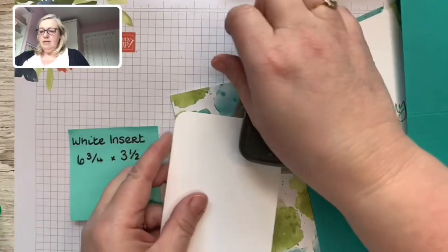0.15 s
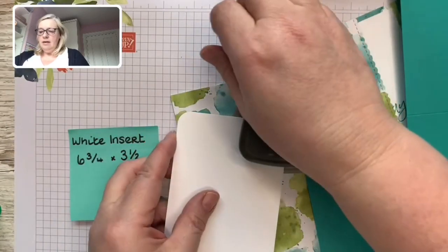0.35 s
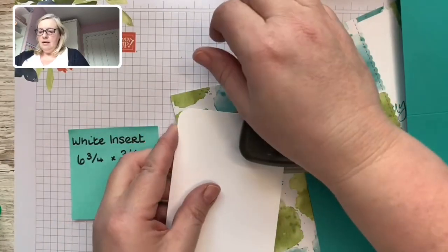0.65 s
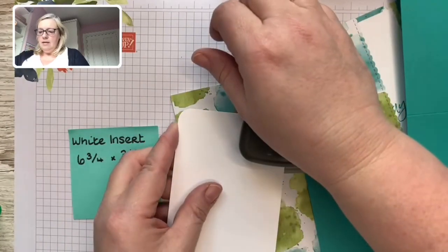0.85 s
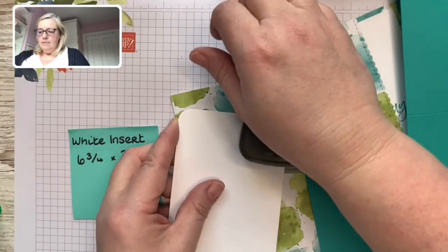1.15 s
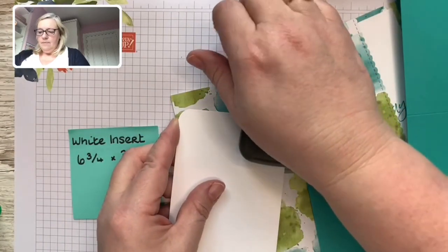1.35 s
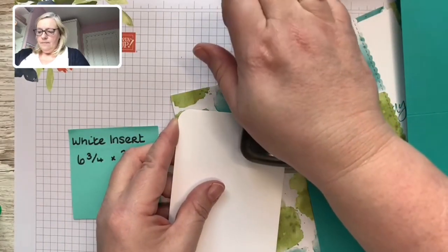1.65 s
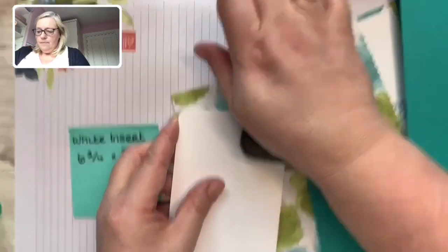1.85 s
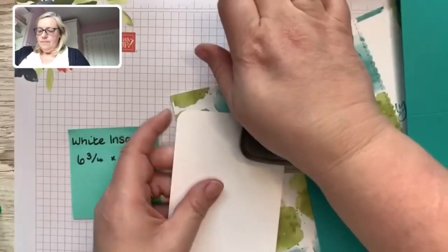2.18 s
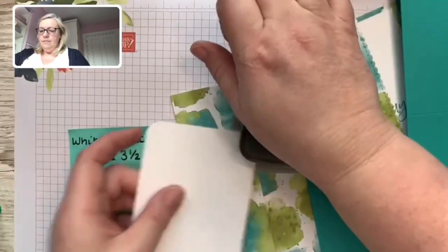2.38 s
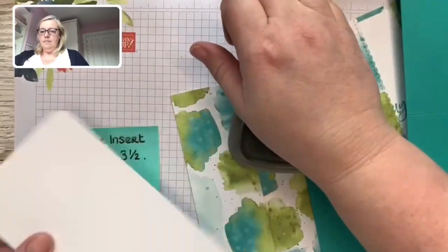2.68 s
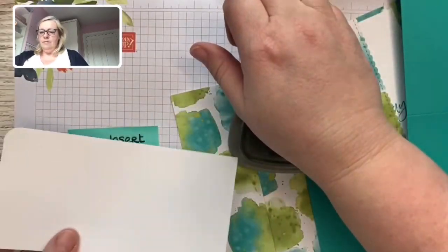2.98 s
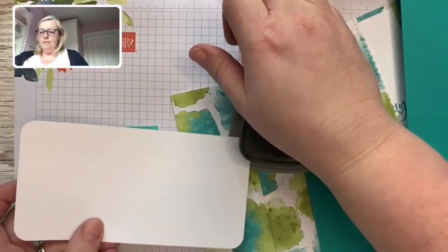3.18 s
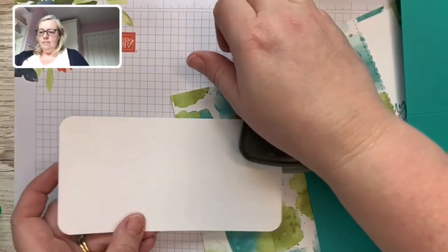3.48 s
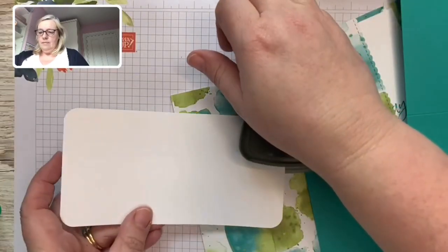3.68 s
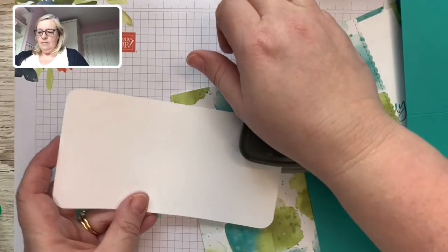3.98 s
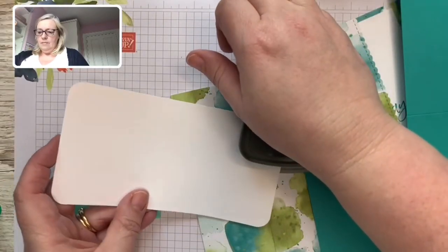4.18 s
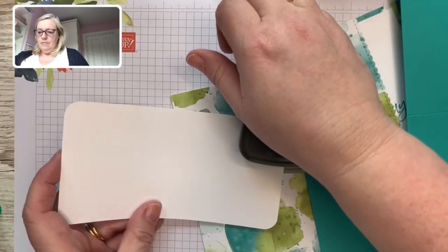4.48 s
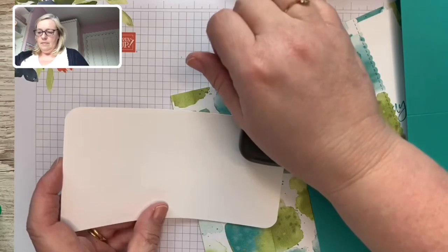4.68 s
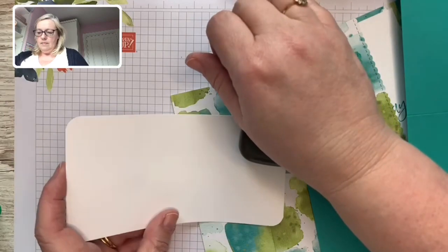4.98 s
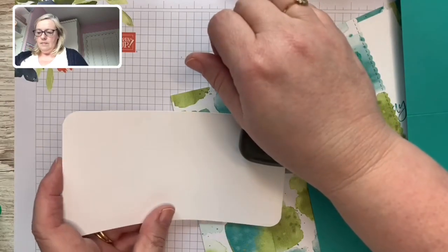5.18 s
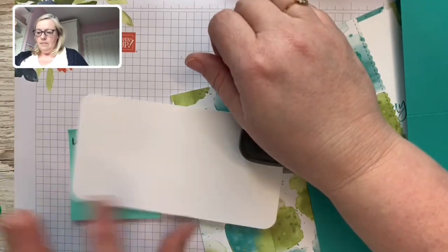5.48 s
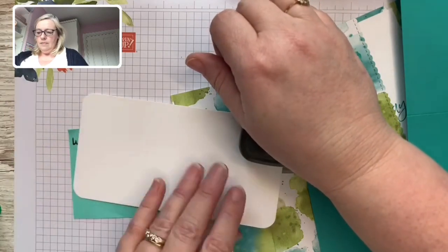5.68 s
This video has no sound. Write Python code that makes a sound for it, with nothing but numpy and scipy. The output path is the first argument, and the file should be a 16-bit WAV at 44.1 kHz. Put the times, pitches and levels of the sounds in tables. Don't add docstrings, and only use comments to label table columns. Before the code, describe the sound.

A hand-held punch bites and shears through a card corner: quiet handling, gathering creaks, a hard double-edged crack with a thump through the table, then loosening plastic ticks. Card brushes and slides softly afterwards, two small plastic clicks sound, the second brighter, and a flurry of taps and rustles ends it. Mono, close microphone, short indoor reflections and low hiss.

```python
import sys
import numpy as np
from scipy import signal
from scipy.fft import rfft, irfft, next_fast_len
from scipy.io import wavfile
from scipy.ndimage import uniform_filter1d

SR = 44100
rng = np.random.default_rng(int(sys.argv[2]) if len(sys.argv) > 2 else 0)


def dump(signal):
    limited = np.clip(np.atleast_2d(signal).T, -1, 1)
    pcm = np.round(limited * 32767).astype(np.int16)
    wavfile.write(sys.argv[1], SR, pcm)


def gain_from_db(level_db):
    decades = np.asarray(level_db, float) / 20
    return 10 ** decades


N = 257588

# (t/s, crack level/dB, crack length/ms, signed push on the table, push length/ms)
SNAP = [
    (1.7883, -28.5, 3.24, 0.032, 2),
    (1.7929, -18.5, 3.5, -0.078, 0.51),
    (1.7955, -17.5, 4, -0.6, 0.77),
    (1.8089, -10.5, 3.44, 0.24, 1.1),
    (1.8176, -25.5, 2.7, -0.61, 5.8),
    (1.826, -32, 3.4, -0.45, 4.5),
]
# (f/Hz, level/dB per Hz)
CRACK_COLOUR = [(290, -28), (500, -11), (880, -1), (1180, -21.5), (1380, -6.5), (2500, -16), (5300, -22.5),
                (6420, -18), (13400, -23.5), (16000, -35.5)]
# (f/Hz, level/dB, t60/s)
CASE_MODES = [(3623, -7.5, 0.03), (6400, -13, 0.177), (6520, -6, 0.09), (6336, -13, 0.12),
              (8200, -12.5, 0.12), (8324, -1, 0.092), (10900, -5, 0.13), (14000, -13, 0.11)]
# (f/Hz, level/dB, t60/s)
BLADE_MODES = [(1378.8, -25.5, .017), (2140, -32, .014), (2948.7, -20, 0.024), (4517, -28, .012),
               (4665.6, -33.5, 0.014)]
# (f/Hz, level/dB, t60/s)
SPRING_MODES = [(6442, -31, 0.005), (3900, -31.5, .014), (1550, -33, 0.045)]
# (f/Hz, level/dB, t60/s)
TABLE_MODES = [(114.64, -13.5, 0.21), (258.8, 4.5, 0.085), (312.6, -3.5, 0.17), (501.1, -10, 0.1686),
               (681.24, -28.5, 0.13), (821.1, -33.5, 0.95), (932.2, -22, 0.17), (1053.5, -30, 0.7),
               (1570, -37, 0.24), (1785, -42.5, 0.3), (1756.8, -28.5, 0.11), (1924, -35, 0.626)]
# (f/Hz, level/dB, t60/s)
FRAME_MODES = [(72, -24, 0.49), (175.6, -15.5, 0.061), (207.06, -11.5, 0.065), (354, -9.5, .07)]
# (t/s, peak level/dB, push length/ms)
THUDS = [(0.536, -63.5, 7.6), (0.775, -57.5, 0.9), (1.194, -34.5, 6.96), (1.266, -40.5, 3.76),
         (1.3, -45, 1.14), (1.659, -31.5, 1.57), (1.69, -38.5, 1.54), (1.728, -35.5, 1.7),
         (2.136, -36, 2.2), (2.15, -40, 1.9), (2.188, -34.5, 2), (2.352, -58, 3.05), (2.398, -37.5, 9.3),
         (3.027, -50, 1.87), (3.699, -53, 3.9), (3.784, -35.5, 5.6), (4.72, -45.5, 5.41),
         (5.359, -33.5, 5.54)]

# (t/s, peak level/dB, half width/octaves)
CREAKS = [(1.37, -57, 0.243), (1.476, -47.5, 0.194), (1.494, -51, 0.235), (1.506, -42, 0.316),
          (1.596, -33, 0.77), (1.622, -36, 0.77), (1.631, -36.5, 0.75), (1.657, -39.5, 0.29),
          (1.688, -30.5, 0.99), (1.721, -39.5, 0.56), (1.73, -40.5, 0.81), (1.749, -26.5, 1.1),
          (2.008, -33, 0.25), (2.03, -42, 1.065), (2.137, -42.5, 0.84), (2.186, -27, 1.012),
          (2.214, -34.5, 1.29), (2.218, -42, 0.41), (2.721, -51, 0.366), (3.029, -50.5, 0.7)]
CREAK_HZ, CREAK_MS = 832.6, 3.1
CREAK_EDGE_DB, EDGE_DB_PER_OCTAVE = -51.5, 29.5
# (t/s, peak level/dB, centre f/Hz, bright edge level/dB re peak)
TAPS = [(0.532, -36.5, 1031, -38.5), (0.561, -42.5, 990, -11), (1.258, -33.5, 1264, -31.5),
        (1.295, -45.5, 1174, -23.5), (1.448, -51, 3650, -6.5), (1.596, -59.5, 3150, -18.5),
        (2.292, -32, 1312, -5.5), (2.374, -42, 1190, 0.5), (2.382, -39, 1177, -5), (2.756, -48.5, 820, 4.5),
        (3.137, -53.5, 1440, -16), (3.469, -48.5, 803, 0), (4.718, -46, 740, -3.5),
        (5.332, -36.5, 1900, -6.5), (5.366, -31.5, 1114, -11), (5.453, -55, 834, 2.5),
        (5.684, -52.5, 7600, 5), (5.721, -50.5, 3190, -5.5), (5.797, -52, 993, -17.5)]
TAP_OCTAVES, TAP_MS = 0.93, 4.18
# (t/s, peak level/dB, centre f/Hz,
# contact/ms)
BRUSHES = [(0.767, -59.5, 2590, 53), (1.451, -54.5, 3220, 24), (1.635, -40.5, 663, 88),
           (1.749, -33.5, 2600, 13), (2.385, -47.5, 597, 34), (3.962, -53.5, 1677, 18),
           (4.148, -56, 2488, 61.4), (4.415, -53.5, 1810, 31), (4.73, -63.5, 1510, 63.4),
           (5.019, -53.5, 2070, 28.8), (5.335, -47.5, 437, 119), (5.368, -43.5, 816, 19.8),
           (5.42, -44.5, 827, 5.16)]
BRUSH_OCTAVES, BRUSH_EDGE_DB_AT_1K, BRUSH_EDGE_DB_PER_OCTAVE = 0.7, -19.5, 8
# (t/s, peak level/dB, f/Hz, contact/ms)
POCKETS = [(1.51, -51.5, 806, 8.9), (1.69, -39, 3900, 3.3), (1.722, -35, 807, 22.4),
           (2.215, -47.5, 2317, 9.5), (2.274, -47, 8280, 18), (2.42, -46.5, 550.8, 4.12),
           (2.76, -52, 3999, 25.8), (5.322, -40.5, 2062, 16), (5.369, -39, 1540, 8.6),
           (5.395, -47.5, 1550, 10.8)]
POCKET_OCTAVES, POCKET_EDGE_DB = 0.15, -31

# (t/s, peak level/dB, bright edge level/dB re peak, ring f/Hz)
GUIDE_CLICKS = [
    (3.6938, -27, -37.5, 4070),
    (3.775, -22, 1.5, 3675),
]
# (f/Hz, level/dB, t60/s)
GUIDE_MODES = [(1999, -49, 0.0122), (485.5, -41.5, 0.0189), (898, -32, 0.011)]
CLICK_HZ, CLICK_OCTAVES, CLICK_MS = 2856, 0.52, 2.83
CLICK_RING_DB, CLICK_T60_S = -7.5, 0.0143
CLICK_SPLIT = 0.949, 1., 1.07

# (t/s when fastest, length/s, hiss level/dB, scrape on the case level/dB re hiss)
STROKES = [(0.06, 0.246, -65, 4.5), (0.536, 0.23, -62, -6.5), (0.8, 0.394, -75.5, 10.5),
           (1.746, 0.117, -77, 3), (1.945, 0.258, -72.5, 12.5), (2.177, 0.312, -56.5, -6.5),
           (2.3, 0.271, -58.5, 3), (2.39, 0.3, -71.5, -11.5), (2.615, 0.23, -58, -7.5),
           (2.779, 0.1783, -62, -1), (3.201, 0.248, -67, -12.5), (3.332, 0.189, -62, 7.5),
           (3.442, 0.207, -65.5, 8), (3.871, 0.36, -66.5, -4.5), (4.202, 0.363, -71, 5.5),
           (4.434, 0.301, -69.5, 3), (4.778, 0.267, -62, 2), (5.302, 0.0983, -48.5, -0.5),
           (5.359, 0.12, -55.5, 6.5), (5.453, 0.051, -64.5, 2.5), (5.643, .2, -65, -5.5),
           (5.826, 0.249, -59.5, -10)]
REST_DB, STROKE_EDGE_DB = -81, -14
STROKE_RISE = 0.4517
# (t/s, load level/dB)
HAND_LOAD = [(0, -63), (.25, -79), (.72, -69), (1.1, -74), (1.4, -61.5), (1.59, -54.5), (1.676, -40.5),
             (1.78, -39), (2.04, -54), (2.159, -48.5), (2.27, -58), (2.401, -48.5), (2.55, -63.5),
             (2.92, -67.5), (3.961, -65.5), (5.15, -73.5), (5.6, -65.5), (5.84, -67.5)]
STRAIN_DB, DRAG_DB = -19.5, -8
# (f/Hz, level/dB per Hz)
HISS_COLOUR = [(1470, -34), (2500, -18.5), (2900, -1.5), (3460, -10), (5150, -6.5), (6860, -3.5),
               (8020, -7), (13700, -11), (16000, -20)]
# (f/Hz, level/dB, t60/s)
SHEET_MODES = [(1660, -3, .02), (2950, -1, .013), (4959.5, -1, .012), (7800, -3.5, 0.02)]
SHEET_DB = -6

# (f/Hz, level/dB at the blow, t60/s)
STAND_MODES = [(202.2, -59, 8.0), (204.47, -59, 8.0)]
# (f/Hz, level/dB at the blow, t60/s)
SWAY_MODES = [(928, -41, 0.41), (1545.4, -41, .22), (94.3, -54.5, 4.1), (77.36, -56, 3.5)]
# (f/Hz, level/dB re direct, t60/s)
ROOM_BANDS = [(299.23, -2, 0.09), (1215.8, -5.5, 0.1723), (3925, -8, 0.19594), (8400, -7.5, 0.19),
              (12843, -22, 0.11)]
# (f/Hz, level/dB per Hz)
AIR_COLOUR = [(18, -44), (30, -13.5), (75, 0.5), (154, -4), (200, -2), (1080, -12.5), (1520, -11),
              (4040, -14.5), (4860, -17.5), (8020, -19), (12200, -22), (14700, -32), (16300, -55.5)]
AIR_DB = -63.5


def unit(x):
    return x / np.sqrt(np.mean(x ** 2))


def coloured(x, points):
    hz, db = np.transpose(points)
    size = next_fast_len(len(x))
    log_hz = np.log(np.arange(size // 2 + 1) * SR / size + 1)
    gain = gain_from_db(np.interp(log_hz, np.log(hz), db))
    return irfft(rfft(x, size) * gain, size)[:len(x)]


def band(x, lo_hz, hi_hz):
    edges = [lo_hz, min(hi_hz, 0.45 * SR)]
    return signal.sosfilt(signal.butter(2, edges, "bandpass", fs=SR, output="sos"), x)


def ring(x, modes, damp=1.0):
    out = 0
    for hz, db, t60 in modes:
        pole = np.exp(2j * np.pi * hz / SR - np.log(1000) / (damp * t60 * SR))
        out = out + gain_from_db(db) * signal.lfilter([1], [1, -pole], x).imag
    return out


def add(out, s, piece):
    i = int(s * SR)
    out[i:i + len(piece)] += piece[:len(out) - i]


def walk(rate):
    hold = int(SR / rate)
    steps = np.repeat(rng.standard_normal(N // hold + 1), hold)
    return unit(uniform_filter1d(steps, hold)[:N])


def push(ms):
    shape = np.sin(np.linspace(0, np.pi, int(ms * SR / 1000) + 3))
    return shape / shape.sum()


def snap():
    tear, jolts, force = np.zeros(N), np.zeros(N), np.zeros(N)
    t = np.arange(1024) / SR
    for s, db, ms, size, push_ms in SNAP:
        envelope = np.minimum(t / 0.0011, 1) / (1 + (1000 * t / ms) ** 2.6)
        burst = gain_from_db(db) * envelope * rng.standard_normal(len(t))
        add(tear, s, burst)
        add(jolts, s, np.array([np.linalg.norm(burst)]))
        add(force, s, size * push(push_ms))

    click = np.zeros(512)
    click[256] = 1
    colour = coloured(click, CRACK_COLOUR)
    colour = colour / np.linalg.norm(colour)
    near = np.roll(signal.fftconvolve(tear, colour)[:N], -256)
    far = np.roll(signal.fftconvolve(jolts, colour)[:N], -256)

    cutting = np.arange(N) < int(SNAP[3][0] * SR)
    body = gain_from_db(-36) * ring(tear, CASE_MODES, damp=0.2)
    body = body + ring(jolts * ~cutting, SPRING_MODES)
    body = body + ring(jolts * cutting, BLADE_MODES)
    return near + body, far + body, force


def thuds():
    force = np.zeros(N)
    for k, (s, db, ms) in enumerate(THUDS):
        add(force, s - 0.002, (-1) ** k * gain_from_db(db - 2.0) * push(ms))
    return force


def table_boom(jolt):
    modes = TABLE_MODES + FRAME_MODES
    return ring(jolt, modes, damp=0.731) + ring(thuds(), modes)


def ticks(hits, modes):
    near, far = np.zeros(N), np.zeros(N)
    t = np.arange(4096) / SR
    impulse = 1. * (t == 0)
    for s, db, hz, edge_db, octaves, ms in hits:
        shape = np.minimum(t / (0.0011 + ms / 5000), 1) * np.exp(-(1000 * t / ms) ** 2)
        body, edge = rng.standard_normal((2, len(t))) * shape
        spread = 2 ** np.clip(octaves, 0.1, 2)
        layers = ((body, hz / spread, hz * spread, gain_from_db(db)), (edge, 4000, 13000, gain_from_db(db + edge_db)))
        for x, lo_hz, hi_hz, gain in layers:
            burst = band(x, lo_hz, hi_hz)
            burst = gain * burst / abs(burst).max()
            click = band(impulse, lo_hz, hi_hz)
            smooth = click * np.linalg.norm(burst) / np.linalg.norm(click)
            add(near, s, burst)
            add(far, s, burst if ms > 6 else smooth)
        if modes:
            rung = gain_from_db(db) * ring(body, modes)
        else:
            rung = ring(body, [(hz, 0, 24 / hz)])
            rung = gain_from_db(db - 12 * octaves) * rung / abs(rung).max()
        add(near, s, rung)
        add(far, s, rung)
    return near, far


def small_hits():
    hits = []
    for s, db, wide in CREAKS:
        edge_db = CREAK_EDGE_DB + EDGE_DB_PER_OCTAVE * wide
        hits.append((s, db, CREAK_HZ, edge_db, wide, CREAK_MS))
    for tap in TAPS:
        hits.append((*tap, TAP_OCTAVES, TAP_MS))
    for s, db, hz, ms in BRUSHES:
        edge_db = BRUSH_EDGE_DB_AT_1K + BRUSH_EDGE_DB_PER_OCTAVE * np.log2(hz / 1000)
        hits.append((s, db, hz, edge_db, BRUSH_OCTAVES, ms))
    for s, db, hz, ms in POCKETS:
        hits.append((s, db, hz, POCKET_EDGE_DB, POCKET_OCTAVES, ms))
    return ticks(hits, None)


def guide():
    hits = [(s, db, CLICK_HZ, edge_db, CLICK_OCTAVES, CLICK_MS) for s, db, edge_db, _ in GUIDE_CLICKS]
    near, far = ticks(hits, GUIDE_MODES)
    impulse = 1. * (np.arange(4096) == 0)
    rings = np.zeros(N)
    for s, db, _, hz in GUIDE_CLICKS:
        modes = [(hz * k, db + CLICK_RING_DB, CLICK_T60_S) for k in CLICK_SPLIT]
        add(rings, s + 0.001054, ring(impulse, modes))
    return near + rings, far + rings


def effort():
    t = np.arange(N) / SR
    s, load_db = np.transpose(HAND_LOAD)
    load = gain_from_db(2 * np.interp(t, s, load_db))
    hiss, scrape = gain_from_db(2 * REST_DB), 0
    for s, length, db, scrape_db in STROKES:
        away = np.where(t < s, (s - t) / STROKE_RISE, (t - s) / (1 - STROKE_RISE)) / length
        power = gain_from_db(2 * (db + STROKE_EDGE_DB * away ** 1.554))
        hiss = hiss + power
        scrape = scrape + power * gain_from_db(2 * scrape_db)
    powers = hiss, scrape + load * gain_from_db(2 * STRAIN_DB), load + scrape * gain_from_db(2 * DRAG_DB)
    return (10 * np.log10(p) for p in powers)


def slide():
    hiss_db, scrape_db, load_db = effort()
    grit = gain_from_db(2.5 * rng.exponential(size=N) * (rng.random(N) < 0.1))
    grain = coloured(rng.standard_normal(N) * grit, HISS_COLOUR)

    patches = 0
    for hz in (2500, 3900, 6100, 9500, 14800):
        patches = patches + band(grain, hz / 1.25, hz * 1.25) * gain_from_db(1.3 * walk(18))
    hiss = unit(patches) * gain_from_db(hiss_db + 1.8 * walk(44) - 4.5)

    stick_slip = rng.standard_normal(N) * gain_from_db(3.0 * walk(90))
    scrape = unit(band(stick_slip, 600, 3500))
    scrape = scrape + gain_from_db(-4) * unit(ring(stick_slip, TABLE_MODES[4:], damp=0.2))
    scrape = scrape + gain_from_db(SHEET_DB) * unit(ring(grain, SHEET_MODES))

    uneven = band(rng.standard_normal(N) * gain_from_db(2.3 * walk(30)), 86, 680)
    rumble = unit(ring(uneven, TABLE_MODES[:5], damp=0.1101))
    return hiss + scrape * gain_from_db(scrape_db - 4.0) + rumble * gain_from_db(load_db - 1.5)


def stand():
    blow = np.zeros(N)
    blow[int(SNAP[2][0] * SR)] = 1
    return ring(blow, STAND_MODES + SWAY_MODES)


def room():
    t = np.arange(16384) / SR
    tail = 0
    for hz, db, t60 in ROOM_BANDS:
        part = band(rng.standard_normal(len(t)), hz / 1.776, hz * 1.653)
        part = part * 1000. ** (-t / t60) * np.clip(t / 0.0029, 0, 1)
        tail = tail + gain_from_db(db) * part / np.sqrt(np.sum(part ** 2) / (3 * hz / SR))
    return tail


def air():
    return unit(coloured(rng.standard_normal(N), AIR_COLOUR)) * gain_from_db(AIR_DB - 2.5 + 0.63 * walk(4.4))


def scene():
    crack, crack_far, jolt = snap()
    boom = table_boom(jolt)
    small, small_far = small_hits()
    clicks, clicks_far = guide()
    steady = slide() + stand() + air()
    to_walls = crack_far + small_far + clicks_far + gain_from_db(-6.5) * boom
    walls = signal.fftconvolve(to_walls, room())[:N]
    return (crack + small + clicks + boom + walls + steady)[None]


def band_limit(x):
    return signal.sosfilt(signal.butter(12, 16490, fs=SR, output="sos"), x)


def record(dry):
    low_cut = signal.butter(8, 59, "highpass", fs=SR, output="sos")
    top_cut = signal.ellip(8, 0.5, 60, 15900, fs=SR, output="sos")
    rounded = np.tanh(signal.sosfilt(low_cut, dry) / 1.1496) * 1.1847
    mix = signal.sosfilt(top_cut, rounded)
    return band_limit(mix)


dry = scene()
out = record(dry)
dump(out)
```